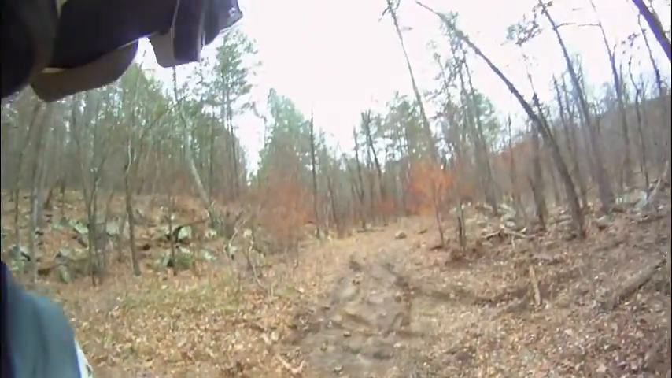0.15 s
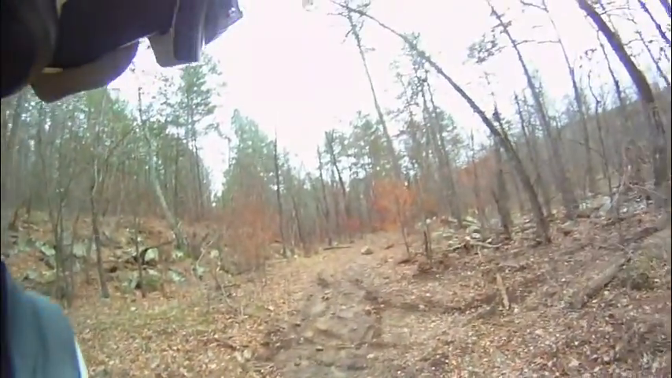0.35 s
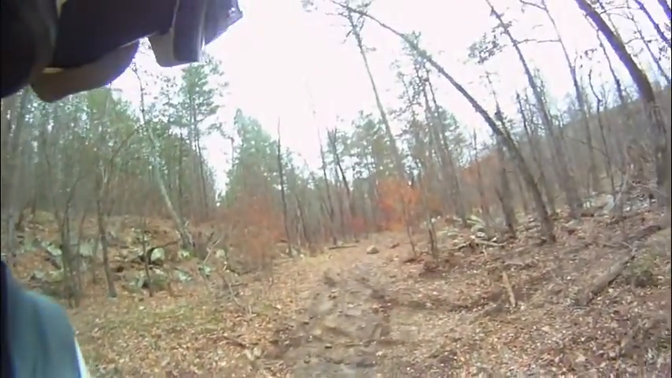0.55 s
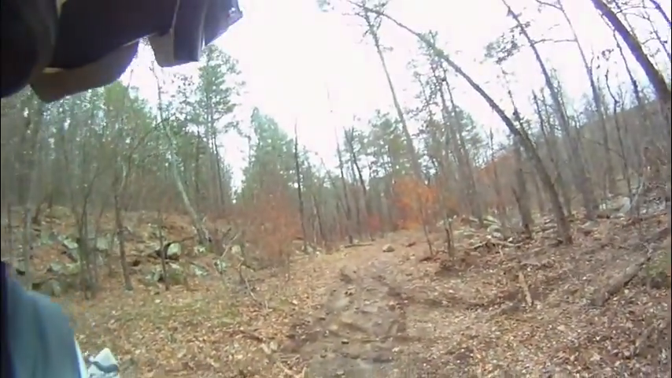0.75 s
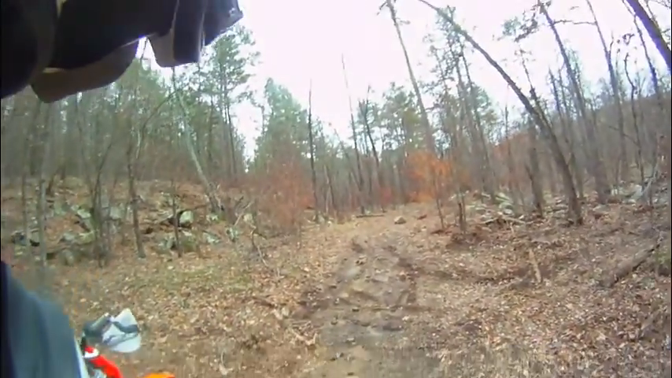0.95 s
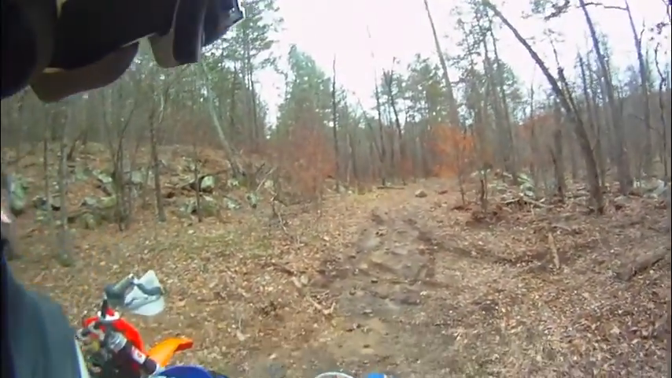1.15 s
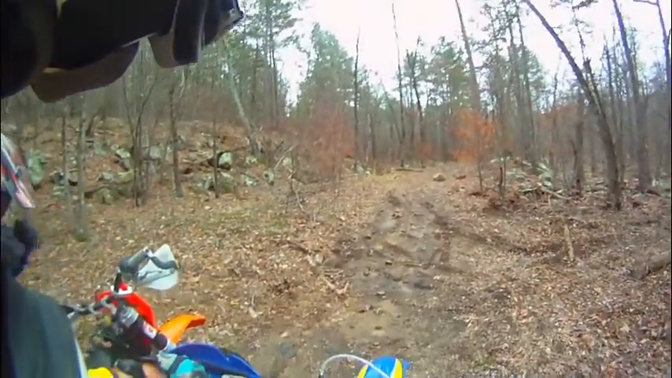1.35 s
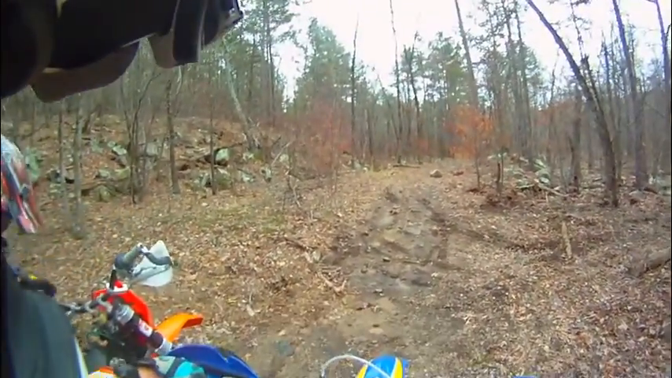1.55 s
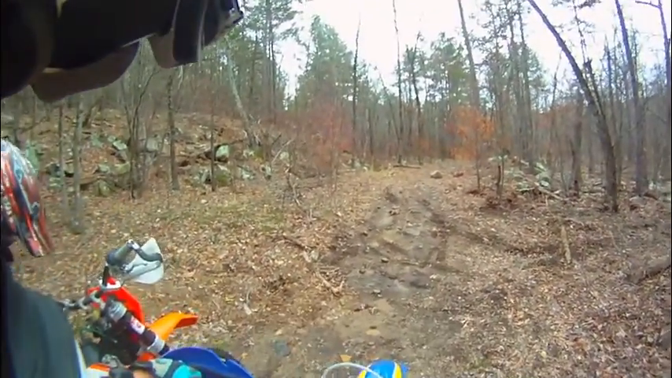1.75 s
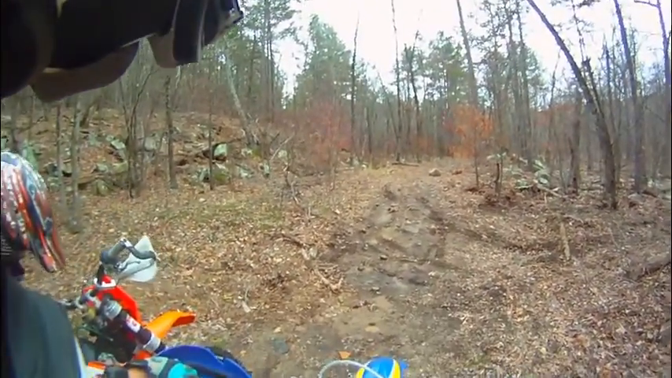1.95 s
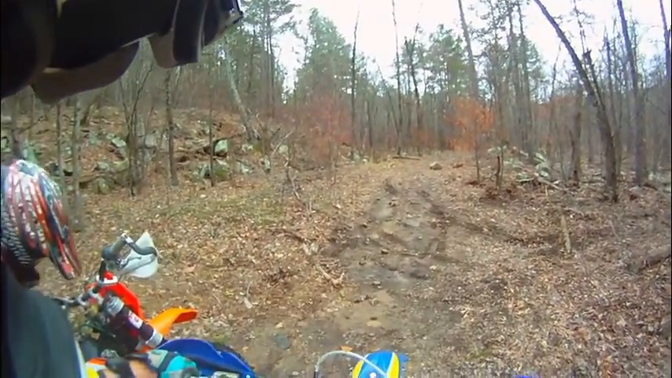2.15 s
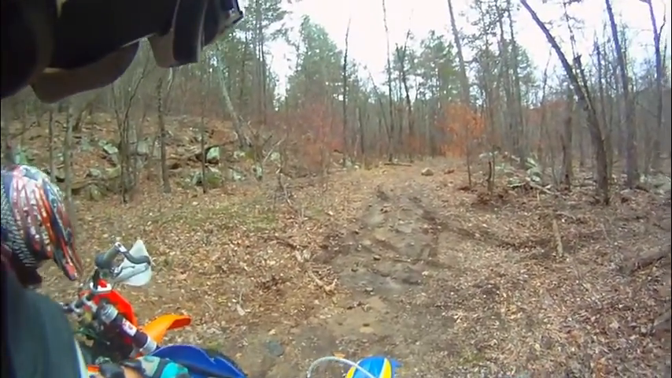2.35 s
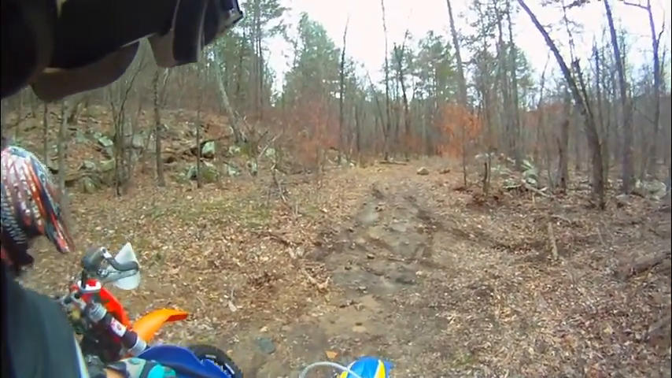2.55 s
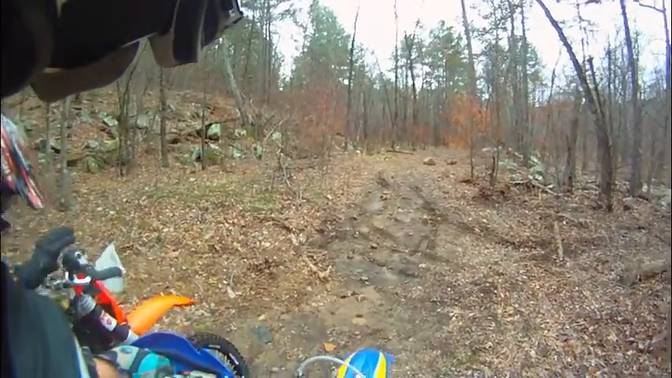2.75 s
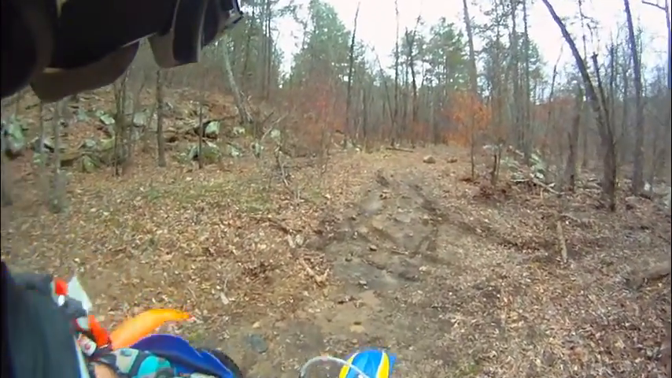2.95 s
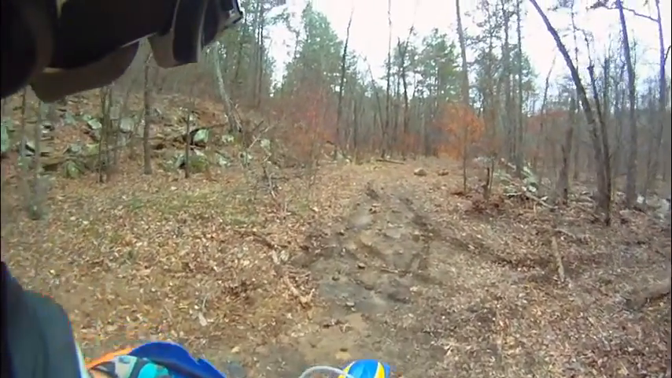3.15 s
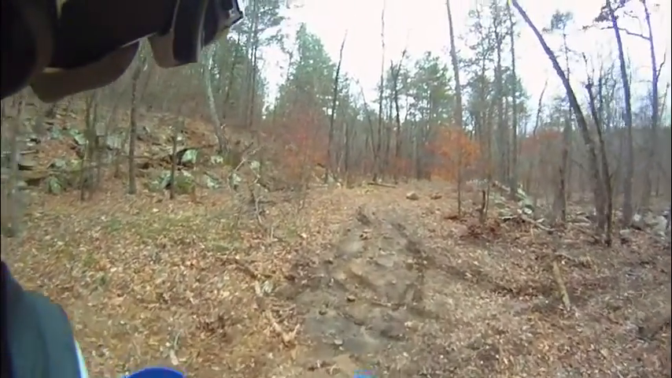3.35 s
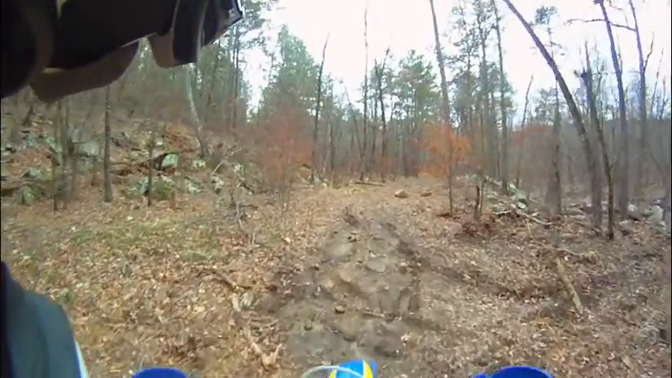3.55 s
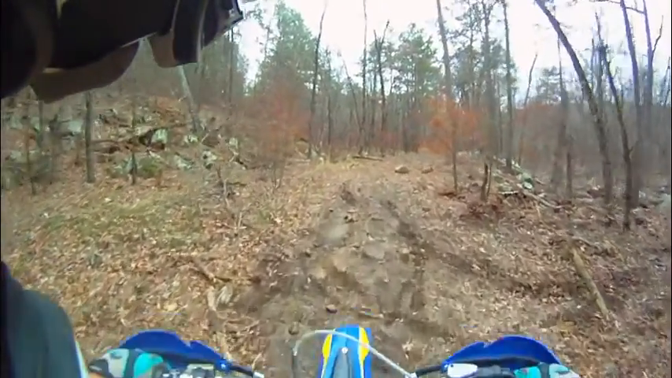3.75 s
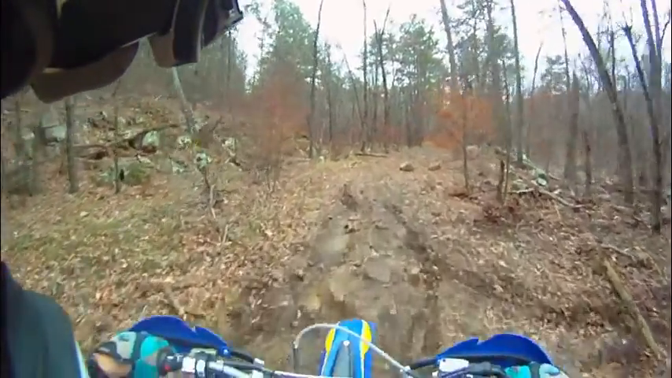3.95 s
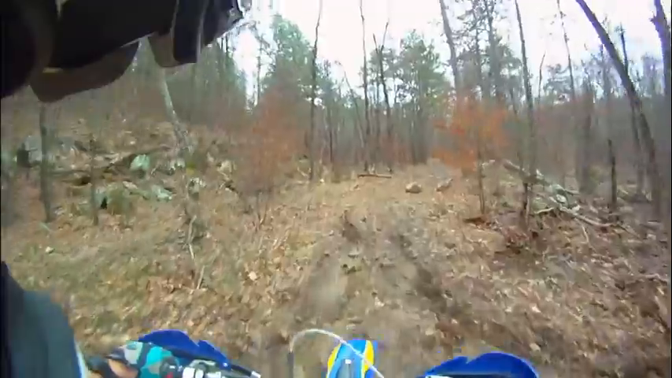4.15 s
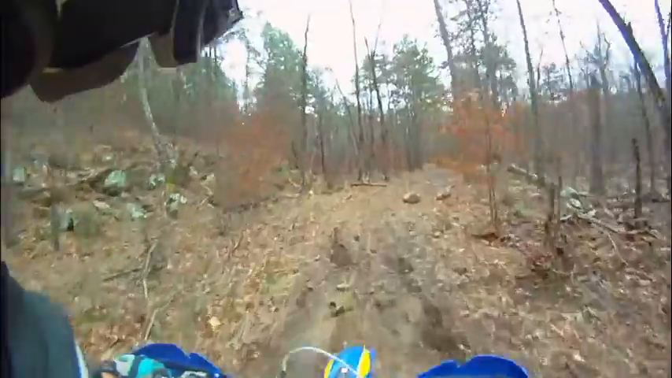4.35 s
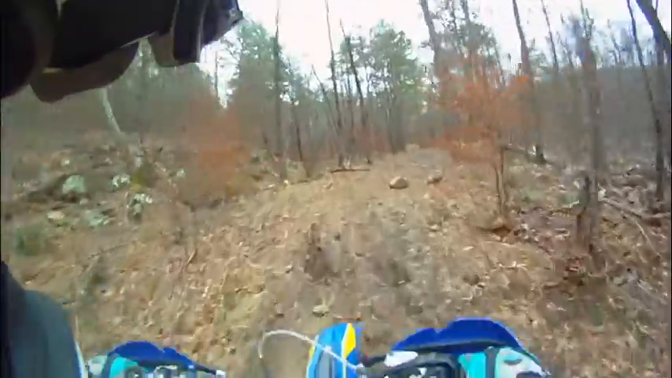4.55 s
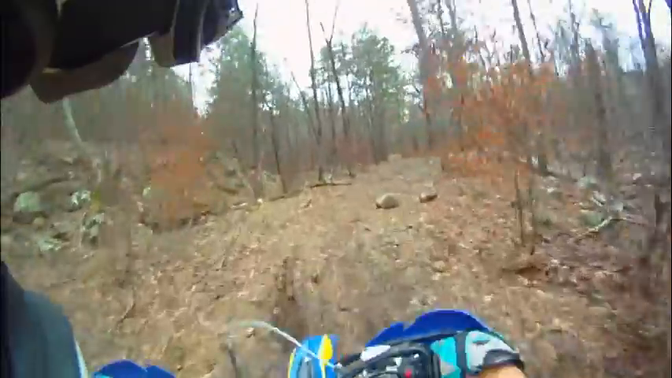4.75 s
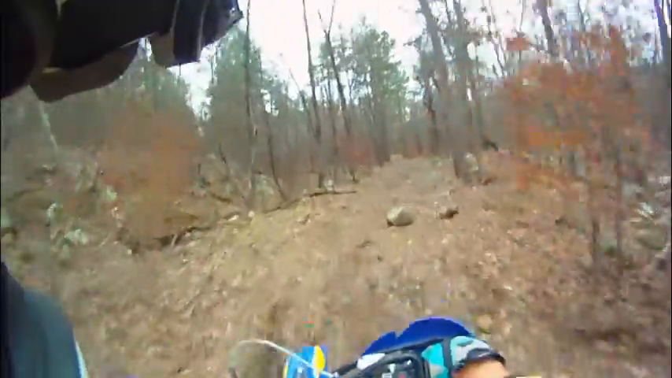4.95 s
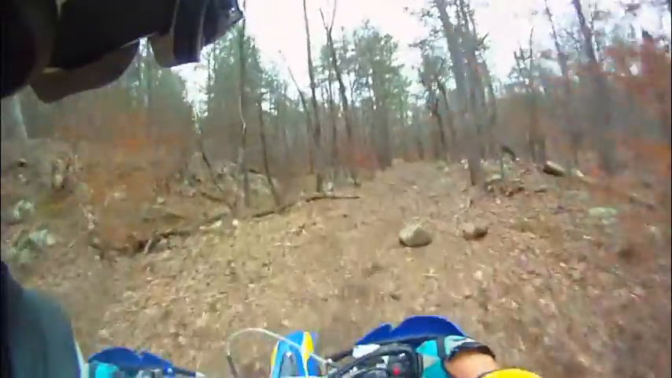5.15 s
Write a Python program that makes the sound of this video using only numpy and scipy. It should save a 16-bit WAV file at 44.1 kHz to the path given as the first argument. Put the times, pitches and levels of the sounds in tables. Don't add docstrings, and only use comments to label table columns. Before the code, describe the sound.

A trail bike's starter clicks, grinds and squeals, the single-cylinder engine catches, idles in slow thuds, then pulls away hard in the woods.

```python
import sys
import numpy as np
from scipy import signal
from scipy.fft import rfft, irfft, next_fast_len
from scipy.io import wavfile
from scipy.ndimage import uniform_filter1d, map_coordinates

SR = 44100
rng = np.random.default_rng(int(sys.argv[2]) if len(sys.argv) > 2 else 0)


def store_wav(level_fs):
    pcm = np.round(np.clip(np.atleast_2d(level_fs), -1, 1) * 32767)
    wavfile.write(sys.argv[1], SR, pcm.T.astype(np.int16))


def volts_from_db(level):
    exponent = np.asarray(level, float) / 20
    return 10 ** exponent


N = 229496

# time_s, firings_per_s
SPEED = [(.799, 4.531), (.9156, 12.622), (.991, 13.8), (1.529, 15.604), (1.602, 14.714), (1.799, 16.168),
         (1.981, 14.54), (2.28, 15.714), (2.498, 14.379), (2.754, 24.825), (3.028, 27.635), (3.317, 24.35),
         (3.706, 24.46), (4.093, 20.339), (4.626, 26.212), (4.672, 29.178), (4.845, 27.541),
         (4.875, 30.684)]
# time_s, opening_0_to_1
THROTTLE = [(.8, 0.04), (1.2, 0.01), (2.5, .01), (2.6, 0.18), (2.72, 0.39), (2.87, 0.6), (3.0, 0.8),
            (3.15, 0.61), (3.6, 0.55), (3.9, 0.37), (4.1, 0.38), (4.3, 0.41), (4.58, 0.71), (4.66, 0.98),
            (4.8, 0.95), (4.9, 1), (4.98, 0.92), (5.2, 0.8)]
# time_s, trip_ms
PIPE_TRIP = [(.8, 5.6), (2.7, 5.2), (3.0, 5.0), (3.6, 5.15), (4.1, 5.5), (4.55, 5.15), (4.9, 5.1),
             (4.96, 4.7), (5.2, 4.7)]
# start_s, level_db, pitch_hz
STROKES = [
    (0.407, -70, 250),
    (.512, -73, 236),
    (0.722, -82, 230),
]
# start_s, level_db, pitch_hz, t60_s
CLICKS = [
    (.082, -53.5, 398, 0.028),
    (0.08, -52, 697, 0.025),
    (0.084, -57, 1000, .025),
    (.083, -48, 1460, 0.025),
    (.269, -55, 4400, .025),
    (.27, -62, 1480, .03),
    (.271, -66, 493, .03),
    (.272, -63, 3000, .025),
    (.208, -67, 3700, .04),
]
# start_s, length_s, from_hz, to_hz (tooth rate), level_db
SQUEALS = [
    (0.305, 0.033, 663, 690, -63.5),
    (0.401, 0.07, 718, 704, -58.5),
    (0.51, 0.051, 707, 680, -62),
    (0.613, 0.11, 730, 605, -74.5),
    (0.733, 0.013, 710, 736, -56),
    (0.756, 0.024, 749, 620, -58),
    (0.887, 0.02, 737, 694, -61),
]
# multiple_of_tooth_rate, level_db
TEETH = [(2, 0), (2.7, -9), (4, -7), (5, 0), (6, -3), (8, -13)]
# peak_s, level_db, rise_db_per_s, fall_db_per_s
SURGES = [
    (.436, -53, 92, 150),
    (0.513, -52, 1100, 50),
    (.668, -50, 117, 248),
    (.762, -48, 190, 300),
    (.8, -56, 60, 12),
    (.908, -54, 112, 12),
]
# pitch_hz, width_hz, level_db
HOUSING = [(1200, 580, -9), (1420, 120, -3.5), (1625, 120, -4), (1930, 220, -4.5)]
RING_GEAR = [(2990, 320, -4.5), (3560, 500, 1.5), (4090, 310, -3.5), (4860, 1200, -12), (6060, 220, -15.5)]
FIZZ = [(7340, 500, 0), (8650, 1100, 2.5), (10800, 3800, -11.5)]
# pitch_hz, width_hz, level_db
GEARS = [(1027, 220, -4), (1412, 290, 0), (1783, 120, -7.5), (1952, 225, -7), (530, 360, -8.5)]
VALVES = [(2682, 187, -4.5), (3170, 504, 0.5), (3720, 1100, -1.5), (4178, 550, 1.5), (4804, 470, -5),
          (5390, 1060, -15)]
INTAKE = [(8000, 1900, -10), (9830, 1800, -12.5), (11600, 6400, -19.5), (5800, 960, -10)]
AIRBOX = [(7840, 140, 0), (8800, 900, -12)]
RUMBLE = [(40, 65, 1.3), (106, 31, 0.71)]
# pitch_hz, level_db
CASE = [(20, -28), (60, -18), (150, 1), (300, 0), (2000, -0.5), (2350, 6), (2900, 0.5), (5000, 0),
        (6600, -4), (8000, -7), (12000, -3.5), (15000, -5)]
FLOOR = [(20, -48), (70, -23), (160, -18), (330, -4), (630, -6), (1000, -1.5), (1500, -1), (2800, -7),
         (4000, -1), (5000, -14), (6500, -18), (7900, -10), (9000, -14.5), (15000, -23)]
# pitch_hz, level_db
WHINE = [(7838, -92), (7897, -90)]

# idle_db, gain_db as the throttle first opens, further gain_db up to full throttle
BOOM_DB, CRACK_DB, BACK_DB = (-55.5, 11, -5), (-68.5, 20.5, 4), (-61.5, 0.8, 34.5)
OPENING = 0.17
WEAK_DB, CATCH_S = -14.5, 0.11
# the same three, then db per firing a second gained within SURGE_S
GEAR_DB, VALVE_DB, HISS_DB = (-56.5, 7, 4, 0.09), (-58.5, 9, 2.7, 0.63), (-74, 0.5, 3, 0.1)
SURGE_S = .12
SETTLE_DB, SETTLE_S = 0.5, 0.18
STRAIN_DB = -54
GRIND_DB, GRIND_GROWS, FIZZ_DB, FIZZ_GROWS = -58.5, 0.43, -82.5, 0.85
FIZZ_ENDS_S = .79


def unit(x):
    return x / np.sqrt(np.mean(x ** 2) + 1e-20)


def curve(rows, at):
    return np.interp(at, *np.transpose(rows))


def filtered(x, response):
    m = next_fast_len(N + 8192)
    return irfft(rfft(x, m) * response(np.fft.rfftfreq(m, 1 / SR)), m)[:N]


def colour(points):
    f, db = np.transpose(points)
    return lambda hz: volts_from_db(np.interp(np.log(hz + 1), np.log(f), db))


def ringing(modes):
    def response(f):
        return np.sqrt(sum(volts_from_db(2 * db) / (1 + (2 * (f - c) / w) ** 2) ** 2 for c, w, db in modes))
    return unit(filtered(rng.standard_normal(N), response))


def wobble(rate):
    return map_coordinates(rng.standard_normal(int(N * rate / SR) + 4), [np.arange(N) * rate / SR])


def burst(t, hz, t60, rise, phase=0):
    t = np.maximum(t, 0)
    return np.sin(2 * np.pi * hz * t + phase) * volts_from_db(-60 * t / t60) * (1 - np.exp(-t / rise)) ** 2


def chirp(t, hz, lag, settle, t60, rise, phase):
    return burst(t, hz, t60, rise, phase - 2 * np.pi * lag * (1 - np.exp(-np.maximum(t, 0) / settle)))


def place(times, rows, lead):
    at = np.round((np.asarray(times) - lead) * SR).astype(int)[:, None] + np.arange(rows.shape[1])
    return np.bincount(at.ravel(), rows.ravel(), N + SR)[:N]


def cycle():
    time = np.arange(N) / SR
    return np.cumsum(curve(SPEED, time) * (time > SPEED[0][0])) / SR


def engine_load(rate):
    return np.clip((rate - 15.5) / 6, 0, 1)


def throttle_level(rule_db, throttle):
    idle_db, open_db, full_db = rule_db
    return idle_db + open_db * (1 - np.exp(-throttle / OPENING)) + full_db * throttle


def noise_level(rule_db, time):
    *throttle_db, surge_db = rule_db
    gained = np.clip(curve(SPEED, time) - curve(SPEED, time - SURGE_S), 0, 3)
    settle_db = SETTLE_DB * np.exp(-np.maximum(time - SPEED[1][0], 0) / SETTLE_S)
    throttle = np.clip(curve(THROTTLE, time), 0, 1)
    return throttle_level(throttle_db, throttle) + surge_db * gained + settle_db


def camera_noise():
    time = np.arange(N) / SR
    hiss = volts_from_db(-76) * unit(filtered(rng.standard_normal(N), colour(FLOOR)))
    return hiss + sum(volts_from_db(db + 3 + 1.5 * wobble(20)) * np.sin(2 * np.pi * hz * time) for hz, db in WHINE)


def woods(x):
    t = np.arange(SR // 4) / SR
    tail = rng.standard_normal(t.size) * volts_from_db(-60 * t / 0.093) * (t > .006)
    return signal.fftconvolve(x, tail / np.linalg.norm(tail))[:N]


def starter_grind():
    time = np.arange(N) / SR
    surges_db = [db - np.where(time < s, rise * (s - time), fall * (time - s)) for s, db, rise, fall in SURGES]
    rattle_db = np.max(surges_db, axis=0)
    strain_db = rattle_db - STRAIN_DB
    grind_db = GRIND_DB + GRIND_GROWS * strain_db
    fizz_db = FIZZ_DB + FIZZ_GROWS * strain_db - 12 * (time > FIZZ_ENDS_S)
    grind = volts_from_db(grind_db) * ringing(HOUSING)
    grind += volts_from_db(rattle_db - 0.5) * ringing(RING_GEAR)
    grind += volts_from_db(fizz_db + 12.5) * ringing(FIZZ)
    engaged = np.clip((time - .27) / 0.013, 0, 1) ** 2 * np.clip((.95 - time) / 0.12, 0, 1)
    return engaged * volts_from_db(1.45 * wobble(91.1)) * grind


def squeal(t, length, from_hz, to_hz, db):
    share = np.clip(t / length, 0, 1)
    hz = (from_hz + (to_hz - from_hz) * share ** 2) * (1 + .004 * wobble(250)[:t.size])
    turn = 2 * np.pi * np.cumsum(hz) / SR
    tone = sum(volts_from_db(level + 4.1 * wobble(64)[:t.size]) * np.sin(k * turn) for k, level in TEETH)
    return volts_from_db(db + 2.5) * np.sqrt(np.abs(np.sin(np.pi * share))) * tone


def thump(t, db, hz):
    return volts_from_db(db) * (chirp(t, hz, 0.47, 0.0026, 0.18, 0.0023, 0) + 2.5 * burst(t, 72, 0.24, .004))


def click(t, db, hz, t60):
    return volts_from_db(db) * burst(t, hz, t60, 0.0011) * (1 + .5 * wobble(1460)[:t.size])


def starter():
    t = np.arange(SR // 5) / SR
    sounds = [squeal(t, *row[1:]) for row in SQUEALS]
    sounds += [thump(t, *row[1:]) for row in STROKES]
    sounds += [click(t, *row[1:]) for row in CLICKS]
    starts = [row[0] for row in SQUEALS + STROKES + CLICKS]
    return starter_grind() + place(starts, np.array(sounds), 0)


def mechanics(turns):
    time = np.arange(N) / SR
    gear_db, valve_db, hiss_db = (noise_level(rule, time) for rule in (GEAR_DB, VALVE_DB, HISS_DB))
    rate = curve(SPEED, time)
    load = engine_load(rate)
    luck = rng.standard_normal((int(turns[-1]) + 2, 3))
    angle_luck, valve_luck, intake_luck = luck[np.round(turns + .4).astype(int) - 1].T

    def swell(angle, sharp):
        return np.exp(sharp * (np.cos(2 * np.pi * (turns - angle)) - 1))

    def blow(angle, life):
        return uniform_filter1d(np.exp(-((turns - angle) % 1) / life), size=70)

    gears = .6 + .6 * (1 - load) * swell(.85, 6) + .6 * load * swell(.14, 4) + .25 * swell(.45, 6)
    valves = .55 - .17 * load + .75 * swell(.93 - .0065 * rate, 11) * volts_from_db(.8 * valve_luck)
    valves += .35 * swell(.12 + .15 * (1 - load), 5)
    hiss = .4 + .7 * blow(.22, .2) + .9 * blow(.5 + .01 * angle_luck, .09) * volts_from_db(1.5 * intake_luck)
    whistle = .2 + swell(.4, 3) * volts_from_db(2.5 * wobble(90))
    rush = volts_from_db(gear_db + 2.45 * wobble(150)) * unit(gears) * ringing(GEARS)
    rush += volts_from_db(valve_db - 1.0 + 1.3 * wobble(250)) * unit(valves) * ringing(VALVES)
    rush += volts_from_db(hiss_db + 3.0 + 2.2 * wobble(200)) * unit(hiss) * ringing(INTAKE)
    rush += volts_from_db(hiss_db - 10 + 10 * load) * unit(whistle) * ringing(AIRBOX)
    rush += volts_from_db(-67.5 + 2.1 * load) * ringing(RUMBLE)
    return rush * np.clip(turns / 0.76, 0, 1)


def silencer_boom(t, rate, load, throttle, cold, boom_luck, upper_luck):
    u = t + .0012
    boom_hz = 307 * (1 - .17 * cold + .012 * boom_luck)
    boom = chirp(u, boom_hz, .83, .003, .075 + .04 * cold - .04 * load, .0027, 1.08)
    upper_t = t - .003 + .00005 * load * (np.minimum(rate, 27) - 24)
    upper_hz = 450 * (1 + .01 * upper_luck)
    upper = chirp(upper_t, upper_hz, 1.48, .0011, .026 - .008 * load, .0006, 5.28)
    push = burst(u, 76.5, 0.102, 0.00675) * volts_from_db(-4.0 - 82 * load)
    push = push + burst(u, 134, 0.046, 0.00022) * volts_from_db(-21.5 + 3.3 * load)
    push = push + burst(t - .008, 354.0, 0.068, 0.013) * volts_from_db(0.5 - 2 * load)
    return boom + (0.45 + 1.77 * load + 1.16 * throttle ** 3) * upper + push


def valve_crack(t, ring_luck):
    front = -.67 * np.exp(-((t + .00074) / .00031) ** 2) + np.exp(-(t / .00024) ** 2)
    front = front + .5 * burst(t + 0.00032, 3214, 0.01, .0001)
    ring = .9 * burst(t, 1540 * (1 + .015 * ring_luck), .009, .0002, 1.55)
    gas = uniform_filter1d(rng.standard_normal((len(ring_luck), t.size)), size=7, axis=1)
    rasp = 0.27 * gas * burst(t + .0012, 0, 0.015, 0.0017, np.pi / 2)
    return front + ring + rasp


def pipe_reflection(t, trip, load, smear_luck, decay_luck):
    def echo(late, hz):
        return chirp(t - late, hz, 1.48, .0011, .012 * volts_from_db(.8 * decay_luck), .0013, 5.28)

    smear_hz = 1020 * (1 + .012 * smear_luck)
    back = echo(trip, smear_hz) + 0.35 * echo(trip + 0.00436, 914) + 0.29 * echo(trip + 0.00645, 966)
    back = back + 0.56 * burst(t - trip - .0022, 1.36 * smear_hz, 0.0058, 0.00047)
    return (0.23 + 0.6 * load) * back


def exhaust(turns):
    fire = np.searchsorted(turns, np.arange(int(turns[-1]) + 1) + 1e-9) / SR
    since = fire[:, None] - fire[0]
    throttle = np.clip(curve(THROTTLE, fire), 0, 1)[:, None]
    weak_db = WEAK_DB * np.exp(-since / CATCH_S)
    boom_db, crack_db, back_db = (throttle_level(rule, throttle) + weak_db for rule in (BOOM_DB, CRACK_DB, BACK_DB))
    rate = curve(SPEED, fire)[:, None]
    load = engine_load(rate)
    cold = np.exp(-since / .09)
    luck = rng.standard_normal((8, len(fire), 1))
    boom_luck, ring_luck, upper_luck, back_luck, smear_luck, boom_level, crack_level, decay_luck = luck
    lead = .003
    t = np.arange(SR // 10)[None] / SR - lead
    trip = curve(PIPE_TRIP, fire)[:, None] / 1000 + .00004 * back_luck
    boom = silencer_boom(t, rate, load, throttle, cold, boom_luck, upper_luck)
    rows = volts_from_db(boom_db + 16.5 + 0.16 * boom_level) * boom
    rows = rows + volts_from_db(crack_db + 20.0 + .5 * crack_level) * valve_crack(t, ring_luck)
    back = pipe_reflection(t, trip, load, smear_luck, decay_luck)
    rows = rows + volts_from_db(back_db + 23.0 + .5 * back_luck) * back
    keep_db = -10 * np.log10(rate / 20)
    return place(fire, volts_from_db(keep_db) * rows, lead)


def scene():
    turns = cycle()
    pipe = exhaust(turns)
    return (pipe + volts_from_db(-17.0) * woods(pipe) + mechanics(turns) + starter())[None]


def top_cut(x):
    return signal.sosfilt(signal.butter(12, 15310, fs=SR, output="sos"), x)


def record(dry):
    mix = filtered(dry[0], colour(CASE)) + camera_noise()
    return top_cut(mix[None])


dry = scene()
out = record(dry)
store_wav(out)
```